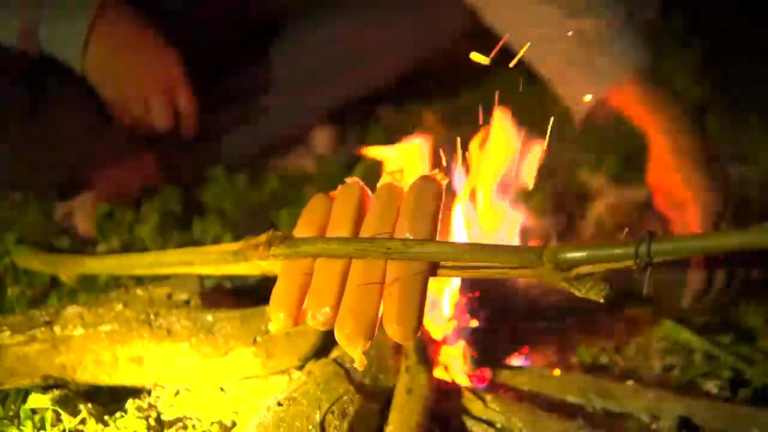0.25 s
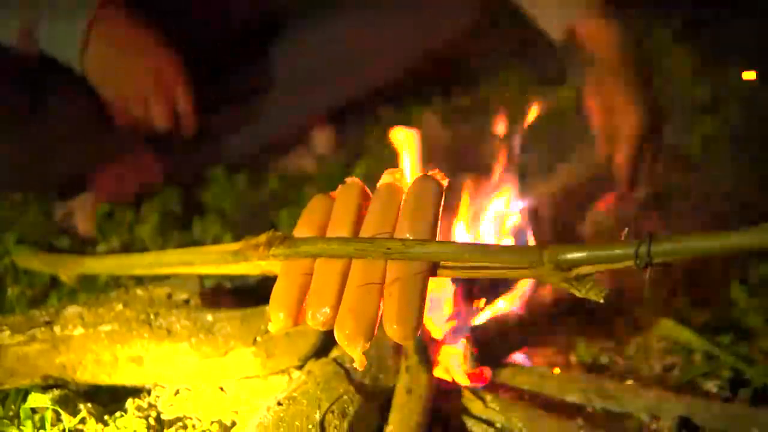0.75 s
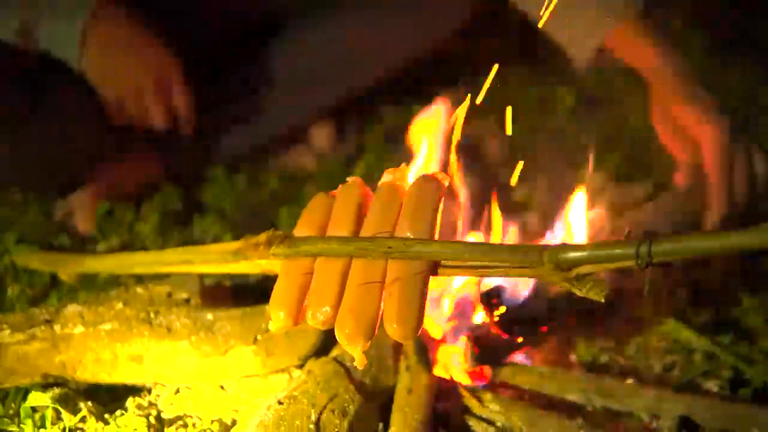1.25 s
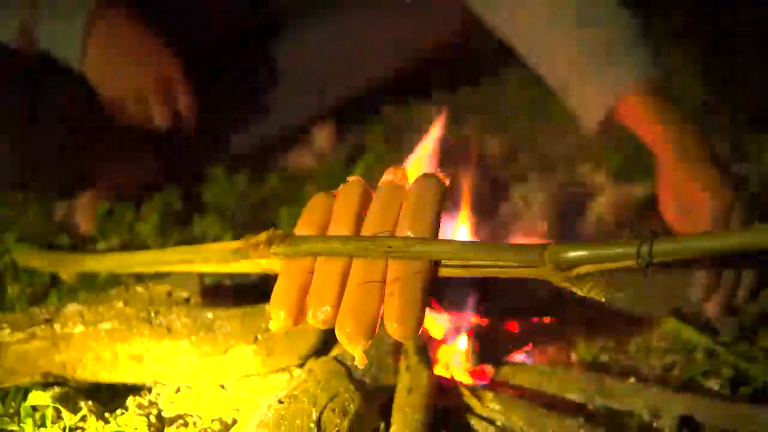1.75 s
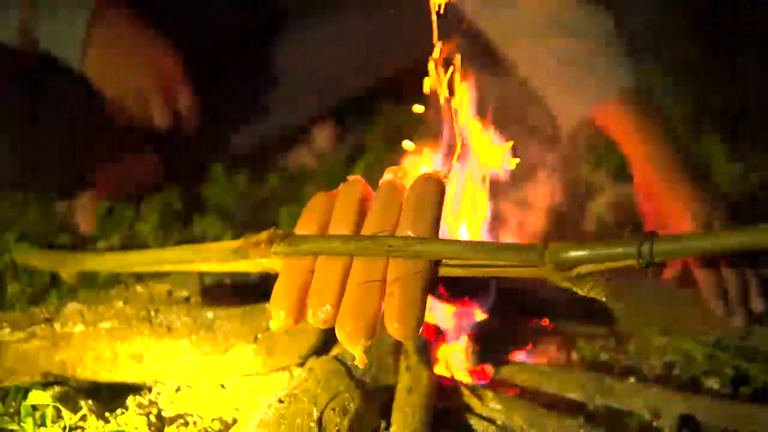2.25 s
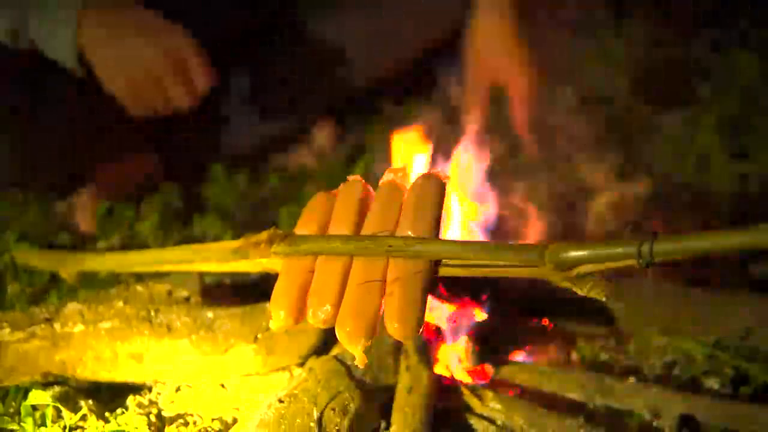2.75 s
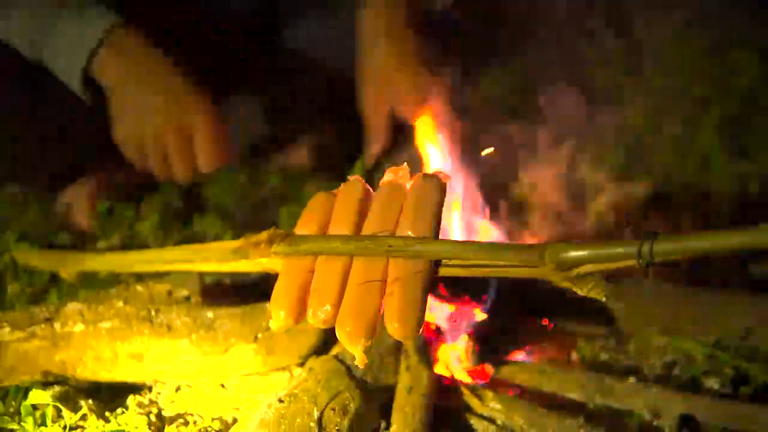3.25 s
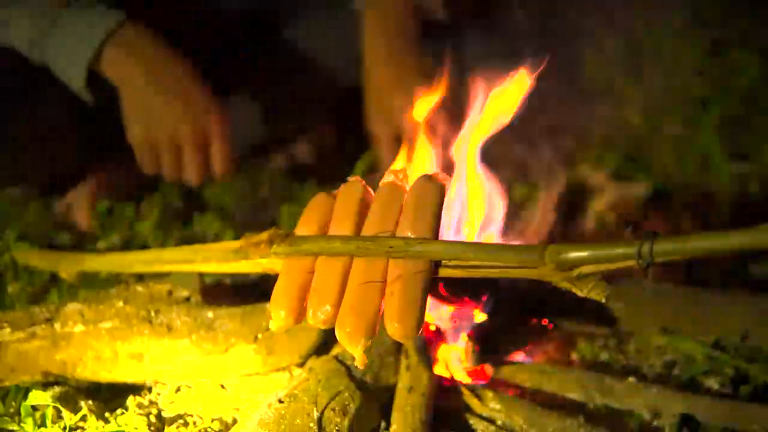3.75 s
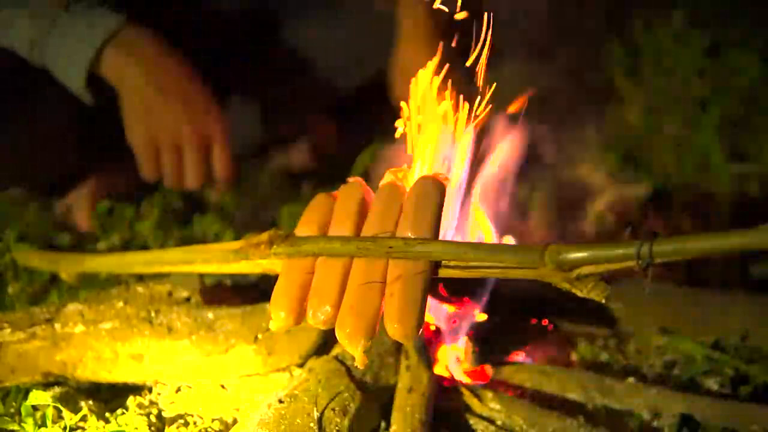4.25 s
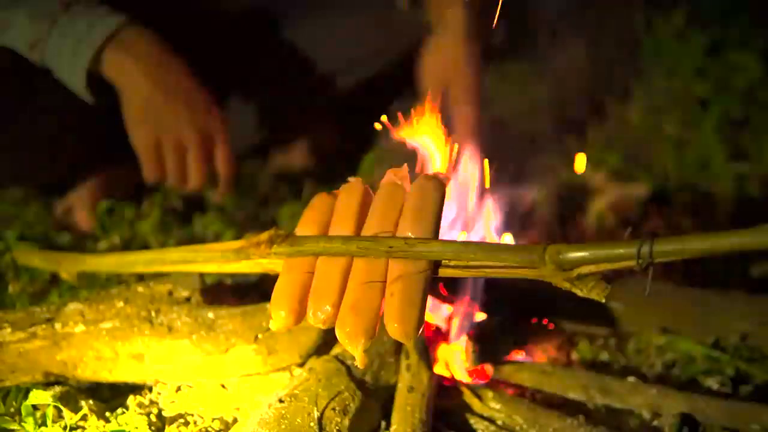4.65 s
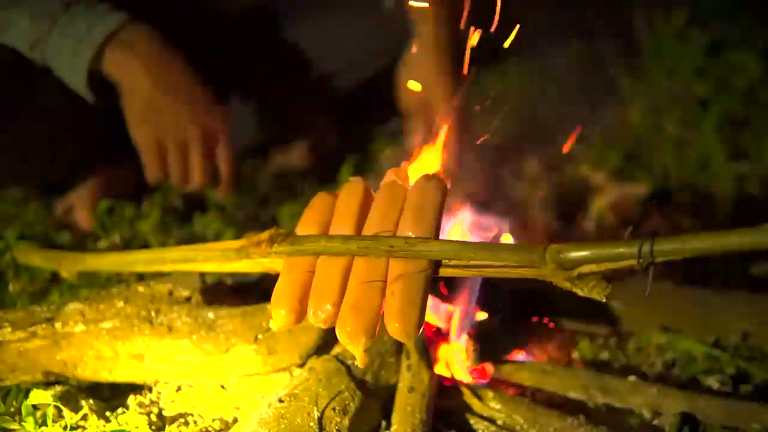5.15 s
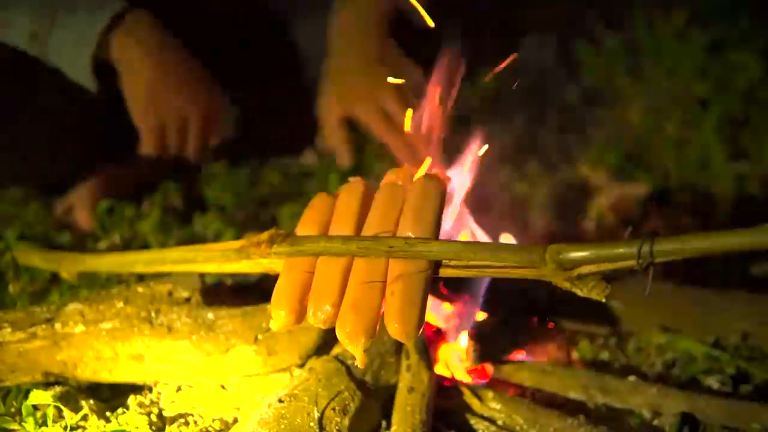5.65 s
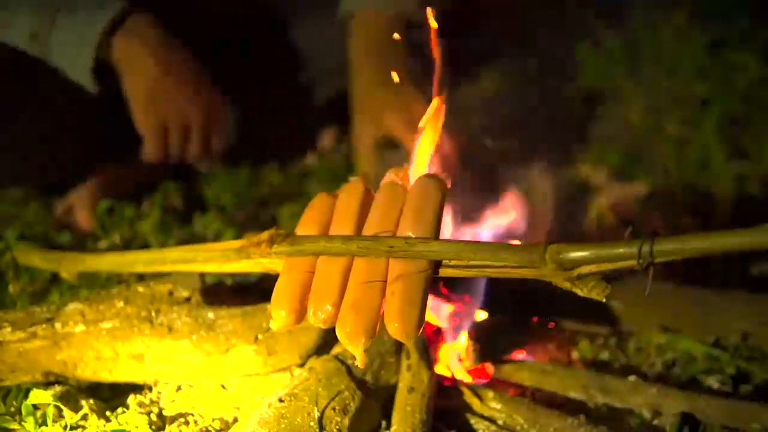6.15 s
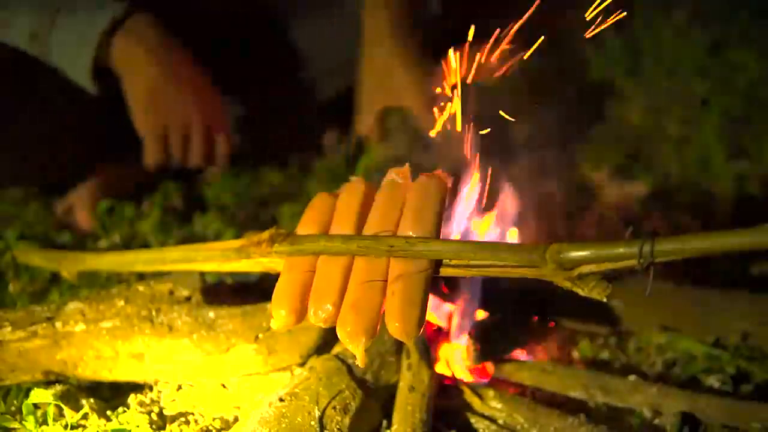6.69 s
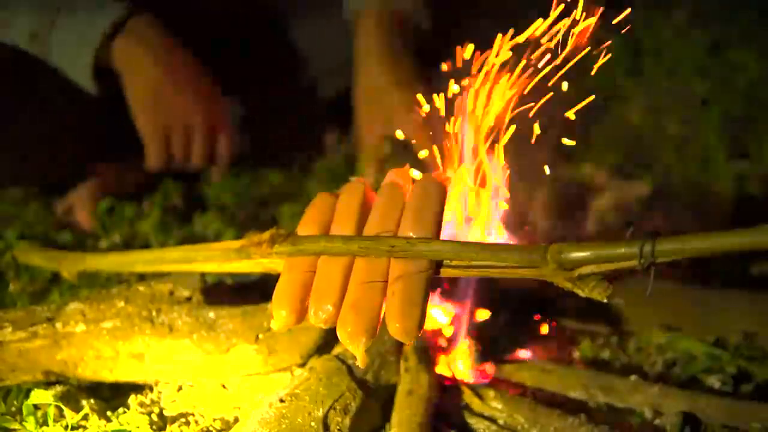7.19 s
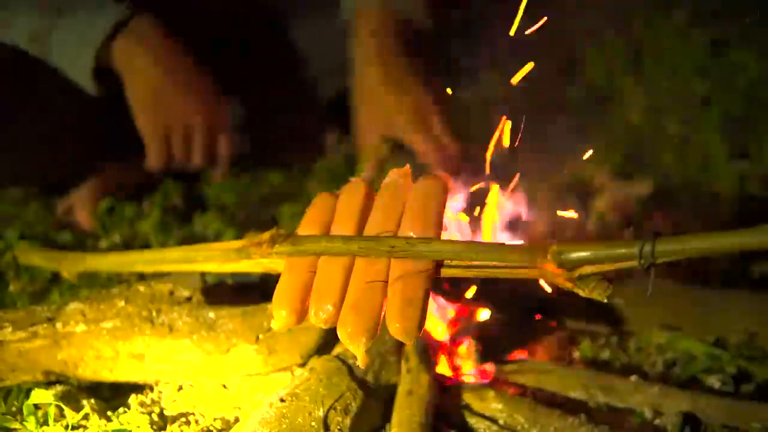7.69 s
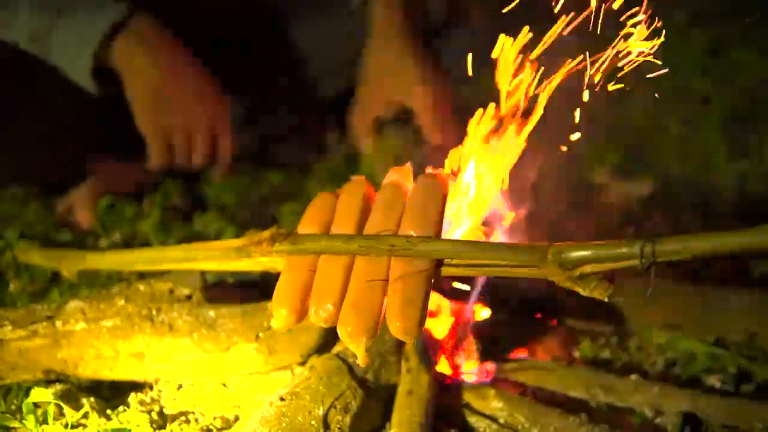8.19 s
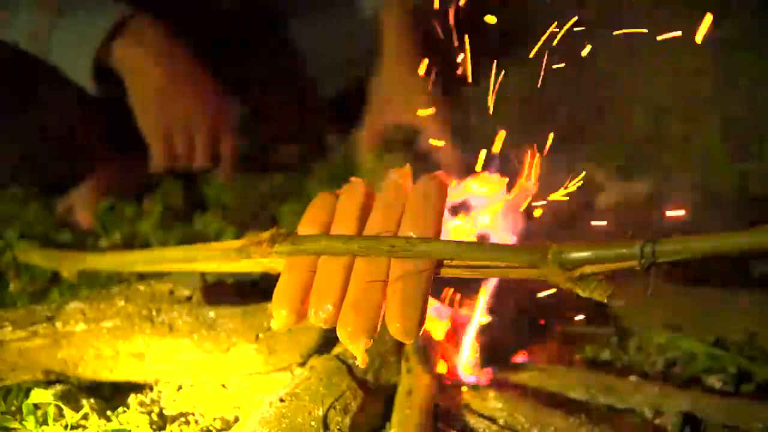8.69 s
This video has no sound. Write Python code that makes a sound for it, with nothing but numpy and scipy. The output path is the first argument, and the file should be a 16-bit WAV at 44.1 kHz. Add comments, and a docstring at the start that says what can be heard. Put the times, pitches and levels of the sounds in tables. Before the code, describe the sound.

Night insects trill and chirp without pause outdoors while a small wood campfire sizzles, pops and cracks, with dry stalks rustling and a few soft knocks.

```python
"""A summer night by a small campfire. From start to end two insects trill without a break and three chirp, in
short trains of tones like wing strokes, over a far crowd and night air; a sixth chirps twice at 1 s. From 0.3 s
handfuls of stalks make noise swell into sizzle and rustle. Wood pops, as noise that grows to a crack and fades:
strongly near 1.8 s, after a big flare at 4 s, in a burst at 7 s and once more at 8.9 s. Soft knocks, made of
fading tones, fall in between, and dull wooden ones sound with some of the pops."""
import sys
import numpy as np
from scipy import signal
from scipy.fft import rfft, irfft, next_fast_len
from scipy.io import wavfile
from scipy.ndimage import uniform_filter1d, map_coordinates

SR = 44100
rng = np.random.default_rng(int(sys.argv[2]) if len(sys.argv) > 2 else 0)


def store_pcm(level_fs):
    """Save levels as 16-bit WAV."""
    pcm = np.round(np.clip(level_fs, -1, 1) * 32767).astype(np.int16)
    wavfile.write(sys.argv[1], SR, np.atleast_2d(pcm).T)


N = 393813  # length in samples


def amp(db):
    """Turn decibels into a plain gain."""
    return 10 ** (np.asarray(db) / 20)


def unit(x):
    """Scale to an average (rms) size of 1."""
    return x / np.sqrt(np.mean(x ** 2) + 1e-20)


def along(points, hz):
    """Read a curve of (pitch_hz, value) points on a log pitch axis."""
    f, v = np.transpose(points)
    return np.interp(np.log(hz + 1), np.log(f + 1), v)


def curves(rows):
    """One value per sample for each column after the time."""
    s, *cols = np.transpose(rows)
    return [np.interp(np.arange(N) / SR, s, c) for c in cols]


def wobble(rate):
    """A smooth random curve with rate knots a second."""
    knots = rng.standard_normal(int(N * rate / SR) + 4)
    return map_coordinates(knots, [np.arange(N) * rate / SR])


def filtered(x, response):
    """Multiply the spectrum of x by a response to frequency."""
    m = next_fast_len(N + 8192)
    return irfft(rfft(x, m) * response(np.fft.rfftfreq(m, 1 / SR)), m)[..., :N]


def sides(pan_db):
    """Left and right gains; a positive pan is louder on the left."""
    return amp([[pan_db / 2], [-pan_db / 2]])


def strokes(times, size, hz, glide_hz, length):
    """Wing strokes: short tones centred on their times (s), gliding by glide_hz over their length (s)."""
    u = np.linspace(-.5, .5, max(round(length * SR), 8))
    turns = (np.reshape(hz, (-1, 1)) * u + glide_hz * u * u / 2) * length
    turns = turns + rng.random((len(times), 1))  # each starts anywhere in its cycle
    tones = np.reshape(size, (-1, 1)) * np.cos(np.pi * u) ** 2 * np.sin(2 * np.pi * turns)
    at = np.round((times[:, None] + u * length + 1) * SR).astype(int)  # one spare second at each end
    return np.bincount(at.ravel(), tones.ravel(), N + 2 * SR)[SR:SR + N]


def in_grass(x, pan_db, wet_db, t60, left_late=0):
    """Direct sound plus scatter off the plants, unlike on the two sides and shifting as they stir."""
    t = np.arange(round(t60 * SR)) / SR
    tails = rng.standard_normal((2, 2, len(t))) * amp(-60 * t / t60)
    a, b = (signal.fftconvolve(x[None], tail / np.linalg.norm(tail[0]), axes=1)[:, :N]
            for tail in tails)
    turn = 1.41 * wobble(4)  # blends between the two scatters
    scatter = np.cos(turn) * a + np.sin(turn) * b
    direct = np.array([np.roll(x, round(left_late * SR)), x])
    return sides(pan_db) * (direct + amp(wet_db) * scatter)


def chirper(chirps, level_db, rate, hz, glide_hz, length, spread_hz, swell_db, scatter_db,
            grows_db=0, paired=0, rises_hz=0):
    """Trains of strokes, rate a second, that swell towards the middle or grow to the end."""
    counts = [round(n) for _, n in chirps]
    times = np.concatenate([s + np.arange(n) / rate - paired * (np.arange(n) % 2)
                            for (s, _), n in zip(chirps, counts)])
    place = np.concatenate([np.linspace(-1, 1, n) for n in counts])  # -1 first stroke, 1 last
    level = np.repeat(level_db, counts) - swell_db * place ** 4 - grows_db * (1 - place) / 2
    luck = rng.standard_normal((len(level), 3))
    times = times + 0.00054 * luck[:, 0]
    size = amp(level + scatter_db * luck[:, 1])
    pitch = hz + rises_hz * place / 2 + spread_hz * luck[:, 2]
    return strokes(times, size, pitch, glide_hz, length)


def triller(table, rate, hz, glide_hz, length, scatter_db):
    """One stroke whenever the slowly drifting beat passes a whole number."""
    ahead, db = curves(table)
    beat = np.arange(N) * rate / SR + ahead
    at = np.flatnonzero(np.diff(np.floor(beat)) > 0)
    luck = rng.standard_normal((len(at), 2))
    size = amp(db[at] + 4.5 + scatter_db * luck[:, 0])
    return strokes(at / SR, size, hz + 12 * luck[:, 1], glide_hz, length)


# Chirps of the low insect: start_s (first stroke), strokes (count)
LOW_CHIRPS = [(0.218, 12), (1.02, 12), (2.204, 14), (3.239, 11), (4.088, 9), (4.832, 8), (5.474, 13),
              (6.279, 7), (6.946, 17), (8.076, 9)]


def low_chirper():
    """A low insect on the right: about ten wing strokes to a chirp, loudest in the middle."""
    levels_db = np.full(len(LOW_CHIRPS), -46.5)
    low = chirper(LOW_CHIRPS, levels_db, rate=42.1, hz=2390, glide_hz=-260, length=0.026,
                  spread_hz=10.0, swell_db=2.5, scatter_db=0.54)
    return in_grass(low, pan_db=-11.5, wet_db=-10, t60=.12)


# Chirps of the middle insect: start_s (first stroke), strokes (count)
MID_CHIRPS = [(.004, 10), (.348, 10), (.705, 11), (1.068, 14), (1.455, 11), (1.805, 11), (2.115, 15),
              (2.474, 14), (2.95, 8), (3.545, 12), (3.975, 10), (4.336, 13), (4.685, 13), (5.038, 13),
              (5.443, 11), (5.77, 12), (6.106, 15), (6.46, 14), (6.825, 14), (7.18, 14), (7.56, 12),
              (7.917, 11), (8.245, 14), (8.614, 13)]


def mid_chirper():
    """A quick-winged insect whose strokes grow and rise in pitch; every second one comes early."""
    levels_db = np.full(len(MID_CHIRPS), -44.5)
    mid = chirper(MID_CHIRPS, levels_db, rate=78, hz=3850, glide_hz=-350, length=0.016, spread_hz=22,
                  swell_db=2, scatter_db=0.6, grows_db=5, paired=.002, rises_hz=60)
    return in_grass(mid, pan_db=-7, wet_db=-9, t60=.1, left_late=7e-5)


# Points on a beat that slows a little: chirp_number (count), start_s (first stroke)
QUICK_BEAT = [(0, .186), (1, .513), (8, 2.775), (11, 3.766), (26, 8.795)]


def quick_chirper():
    """An insect that repeats chirps of five wing strokes about three times a second."""
    starts = np.interp(np.arange(QUICK_BEAT[-1][0] + 1), *np.transpose(QUICK_BEAT))
    levels_db = -48 + 0.5 * rng.standard_normal(len(starts))
    quick = chirper([(s, 5) for s in starts], levels_db, rate=37.3, hz=3986, glide_hz=-900,
                    length=0.02, spread_hz=37, swell_db=2.0, scatter_db=1.5)
    return in_grass(quick, pan_db=-7, wet_db=-5, t60=.08, left_late=7e-5)


# Chirps of the thin, high insect: start_s (first stroke), strokes (count, rounded)
THIN_CHIRPS = [(.99, 5), (1.29, 4.5)]
# One level for each of these chirps, before panning: level_db
THIN_DB = [-53, -55]


def thin_chirper():
    """A high, faint insect: two chirps of wing strokes, heard without scatter."""
    thin = chirper(THIN_CHIRPS, THIN_DB, rate=43, hz=7270, glide_hz=-60, length=0.027,
                   spread_hz=12, swell_db=2.0, scatter_db=1.5)
    return sides(-1.5) * thin


# Drift of the left trill: time_s, ahead_strokes (ahead of a steady beat), level_db (4.5 is added)
LEFT_TRILL = [(0, 0.27, -54), (2.4, 0.28, -54), (3.2, 0.081, -54.5), (4.5, 0.056, -54.5), (5.5, -0.13, -54),
              (6.6, -.17, -54), (8, -0.15, -55.5), (8.93, -0.0038, -54)]


def left_trill():
    """An unbroken trill on the left: fast, even wing strokes."""
    trill = triller(LEFT_TRILL, rate=65.5, hz=2548, glide_hz=-120, length=0.015, scatter_db=2.5)
    return in_grass(trill, pan_db=5.0, wet_db=-3.0, t60=0.16, left_late=-5e-5)


# Drift of the right buzz: time_s, ahead_strokes (ahead of a steady beat), level_db (4.5 is added)
RIGHT_BUZZ = [(0, -0.43, -54), (.6, -0.26, -49.5), (1.5, -0.45, -51), (3.4, -0.21, -48), (5, -0.53, -53),
              (6, -1.01, -49.5), (6.5, -.86, -48.5), (7.6, -0.98, -49.5), (8, -1.16, -49.5),
              (8.93, -0.94, -58)]


def right_buzz():
    """An unbroken, slower and higher trill on the right, with more scatter than direct sound."""
    buzz = triller(RIGHT_BUZZ, rate=32.3, hz=4920, glide_hz=400, length=.014, scatter_db=1.5)
    return in_grass(buzz, pan_db=-9.5, wet_db=4.5, t60=.12, left_late=6e-5)


def singers():
    """The six near insects, each at its own pitch, beat and place."""
    chirping = low_chirper() + mid_chirper() + quick_chirper() + thin_chirper()
    return chirping + left_trill() + right_buzz()


# Edges of the two treble bands of a pop, fizz then snap: low_hz, high_hz
POP_HZ = [(7500, 16000), (4000, 7500)]
SNAP_DB, BODY_DB = -1.5, -6.5  # snap against the mean of fizz and wood; lower wood band against wood
BODY_RATIO = 0.61  # pitch of the lower wood band against the wood
FADE_S = 0.022  # basic fade of a pop, adjusted for each band
CRACK_MS = 59  # divided by the tearing time, gives the crack's size over the tearing noise


def pops(rows):
    """Fibres tear louder and louder, a pocket of steam cracks open; the wood rings in two bands."""
    out, lead = np.zeros(N + SR), 900  # lead: samples kept before each crack
    t = (np.arange(2400) - lead) / SR
    hz = np.fft.rfftfreq(len(t), 1 / SR) + 1
    treble = [1 / (1 + (lo / hz) ** 8) / (1 + (hz / hi) ** 8) for lo, hi in POP_HZ]
    lasts = FADE_S * np.array([[.8], [.9], [1.1], [1.5]]) + 0.0026  # fizz, snap, wood, body
    for s, fizz_db, wood_db, wood_hz, tear_ms in rows:
        tearing = tear_ms + 1
        shape = amp(-60 * np.where(t < 0, -t * 1e3 / tearing, t / lasts) ** 1.08)
        wood = np.exp(-(np.log(hz / wood_hz) / 0.29) ** 2)
        body = 1 / (1 + (np.log(hz / wood_hz / BODY_RATIO) / 0.22) ** 2) ** 0.66
        # short tearing ends in a sharper crack
        force = rng.standard_normal(len(t)) + CRACK_MS / tearing * (t == 0)
        puff = irfft(rfft(force) * (treble + [wood, body])) * shape
        snap_db = (fizz_db + wood_db) / 2 + SNAP_DB
        levels_db = np.array([fizz_db, snap_db, wood_db, wood_db + BODY_DB])
        puff *= amp(levels_db)[:, None] / np.abs(puff).max(1, keepdims=True)
        out[round(s * SR) - lead:][:len(t)] += puff.sum(0)
    return out[:N]


def spits(sizzle):
    """Rows for small random pops: more come when the flaring fire sizzles louder."""
    total = np.cumsum(sizzle[SR // 10:])
    luck = rng.random((round(5 * N / SR), 4))  # 5 a second on average
    s = np.searchsorted(total, luck[:, 0] * total[-1]) / SR + .1
    size_db = -49 - 3.5 * np.log(1 - 0.94 * luck[:, 1])  # most are near the least, -49 dB
    wood_db = size_db - 14 * luck[:, 2]
    wood_hz = 1500 * 1.9 ** luck[:, 3]
    return list(zip(s, size_db, wood_db, wood_hz, np.full(len(s), 7.7)))  # tear_ms last


# Stalks dropped on the flame: middle_s, half_length_s, sizzle_db, hollow_rustle_db, dry_rustle_db
HANDFULS = [(0.276, .15, -56, -66, -67), (.88, .1, -56, -61.5, -60), (1.88, .1, -56.5, -71, -58),
            (2.88, .17, -57.5, -63, -61), (4.063, .1, -45.5, -60, -52), (4.4, .15, -55, -70, -61),
            (4.848, .2, -56, -64.5, -59), (5.18, .05, -62, -59, -53), (5.271, .07, -53, -64, -59),
            (6.405, .12, -56, -69, -54.5), (7.08, .07, -49, -61.5, -59), (8.027, .12, -52, -62, -54),
            (8.503, .18, -57, -57.5, -61)]
# Steady levels between handfuls: sizzle_db, hollow_rustle_db, dry_rustle_db
EMBERS_DB = [-59.5, -69, -63]


def flares():
    """Gains of sizzle, hollow and dry rustle: a steady bed plus one swell of power per handful."""
    t = np.arange(N) / SR
    t = t[::64]  # the swells are slow
    power = sum(amp(db)[:, None] ** 2 * np.exp(-((t - s) / half) ** 2) for s, half, *db in HANDFULS)
    gains = np.sqrt(amp(EMBERS_DB)[:, None] ** 2 + power)
    return np.repeat(gains, 64, axis=1)[:, :N]


def rush(spectrum, alike, patchy_db, grain_db):
    """Stereo noise of rms 1 with patches of random gain and a fast grain."""
    noise = rng.standard_normal((2, N)) * amp(grain_db * wobble(150))
    z = signal.stft(noise, nperseg=512)[2]
    field = rng.standard_normal(z.shape[1:])
    field = uniform_filter1d(uniform_filter1d(field, 6, 0), 10, 1)  # smooth over pitch, then time
    pair = signal.istft(z * amp(patchy_db * unit(field)), nperseg=512)[1][:, :N]

    def response(hz):
        turn = np.arccos(np.clip(along(alike, hz), -1, 1)) / 2  # sets how alike the sides are
        return amp(along(spectrum, hz)) * [np.cos(turn), np.sin(turn)]

    mid, side = filtered(pair, response)
    return unit(np.array([mid + side, mid - side]))


# Knocks: start_s, level_db (before rise and fade), pitch_hz, fade_s (to 60 dB down)
THUMPS = [(.53, -64, 140, 0.046), (.786, -52, 304, 0.029), (.818, -59, 150, .05), (1.775, -37, 1350, .03),
          (3.17, -64, 131, 0.036), (3.946, -46.5, 1075, 0.059), (4.064, -48, 1062, .08),
          (4.14, -50, 1080, 0.12), (4.083, -44.5, 1090, 0.09), (3.62, -66, 170, 0.04),
          (6.998, -47, 950, 0.044), (7.056, -43, 930, 0.065), (7.08, -42, 1030, 0.038),
          (5.14, -49, 626, 0.11), (5.19, -51, 691, 0.13), (5.235, -54.5, 616, 0.09)]


def thumps():
    """Soft knocks: faint low ones of a hand or stick on the ground, and dull wood knocks that sound with some
    pops; tones that start softly and fade."""
    out, t = np.zeros(N + SR), np.arange(SR // 5) / SR
    for s, db, hz, t60 in THUMPS:
        rise = 1 - np.exp(-t / 0.0014)
        out[round(s * SR):][:len(t)] += amp(db - 60 * t / t60) * rise * np.sin(2 * np.pi * hz * t)
    return out[:N]


# Pops: crack_s, fizz_db (peak), wood_db (peak), wood_hz, tear_ms (1 is added); levels before scatter
POPS = [(.1453, -33, -40, 2540, 14), (.2665, -23, -51, 2330, 6), (.8408, -30, -32.5, 2700, 8.7),
        (.8466, -30, -35, 2390, 7.6), (.9523, -38, -39, 4480, 11), (1.2105, -21, -37, 2500, 4.2),
        (1.5563, -43, -50, 3820, 7.4), (1.776, -19.5, -23, 2600, 11.1), (1.7969, -37, -50, 2500, 12),
        (1.8117, -38, -44, 3150, 12), (1.821, -34, -45, 3730, 8.5), (1.93, -36, -56, 2560, 8),
        (3.6129, -40, -50, 4400, 6), (3.857, -40, -42, 2670, 9.5), (3.9463, -30, -49, 2050, 7.1),
        (4.0198, -29, -28, 3170, 4.2), (4.0818, -31.5, -47, 4390, 14), (4.1134, -34, -40, 2610, 16),
        (4.3667, -34.5, -46, 2970, 12), (4.565, -42, -56, 2570, 8), (4.7539, -20.5, -30, 2640, 4.2),
        (4.7792, -37, -42, 3800, 8), (4.833, -34, -56, 2400, 8), (4.9014, -35, -51, 2400, 8),
        (4.9367, -40, -60, 2580, 8), (5.046, -36, -56, 2510, 8.5), (5.137, -45, -32, 1850, 2.2),
        (5.1485, -56, -36, 1720, 15), (5.205, -58, -46, 1750, 15), (5.6119, -31, -34.5, 3380, 5.8),
        (5.8775, -62, -47, 3700, 3), (6.0581, -32, -58, 2510, 8), (6.4075, -38, -51, 2510, 8),
        (6.453, -44, -43.5, 2250, 12), (6.996, -28, -29, 2040, 13), (7.028, -42, -43, 1730, 12),
        (7.0532, -37, -26, 3550, 5.8), (7.0776, -33, -33.5, 1610, 23), (7.0803, -25, -22, 3080, 6.1),
        (7.087, -28.5, -33, 1250, 13), (7.1032, -31, -36, 1950, 16), (7.886, -47, -49, 1970, 8),
        (7.9168, -40, -44, 1620, 8.8), (7.9652, -51, -42, 1955, 8.4), (8.0311, -42, -42.5, 1730, 14),
        (8.1283, -39, -39, 2880, 9.1), (8.2041, -43, -47, 1740, 8), (8.335, -41, -51, 3850, 8),
        (8.4545, -42, -50, 1910, 14), (8.571, -35, -44, 2050, 8), (8.6075, -32.5, -45, 2160, 22),
        (8.6397, -37, -56, 2510, 8), (8.8089, -45, -54, 2500, 8), (8.9187, -20.5, -35, 1150, 7.7)]
# Tone colour of the sizzle: pitch_hz, relative level_db (per Hz)
SIZZLE = [(600, -60), (2500, -30), (5000, 6.5), (7500, 2.5), (9000, 0), (11000, -1.5), (13500, -5),
          (15000, -0.5)]
# Tone colour of the hollow rustle: pitch_hz, relative level_db (per Hz)
HOLLOW = [(100, -56), (250, -27.5), (500, -15), (850, -9.5), (1100, -2.5), (1400, -10), (2500, -30)]
# Tone colour of the dry rustle: pitch_hz, relative level_db (per Hz)
DRY = [(300, -62), (900, -29.5), (1400, -13), (1750, -6), (2200, -0.5), (3200, -1.5), (5000, -16),
       (8000, -30)]


def fire():
    """Pops with a short scatter from nearly straight ahead, over sizzle, rustling stalks and knocks."""
    sizzle, hollow, dry = flares()
    cracks = pops(POPS + spits(sizzle))
    # leaves soak up the treble of the scatter
    dull = filtered(cracks, lambda hz: 1 / (1 + (hz / 6000) ** 2))
    burst = sides(1.0) * (cracks - dull) + in_grass(dull, pan_db=0.0, wet_db=-5.5, t60=0.18)
    # the short lists say how alike left and right are: pitch_hz, likeness (0 to 1)
    sizzle = sizzle * rush(SIZZLE, [(5000, 0.2), (8000, 0.65), (12000, 1.0)], patchy_db=3.4, grain_db=0.5)
    hollow = hollow * rush(HOLLOW, [(1000, 0.48)], patchy_db=3.0, grain_db=1.5)
    dry = dry * rush(DRY, [(1000, 0.97)], patchy_db=2.5, grain_db=1.5)
    return burst + sizzle + hollow + dry + thumps()


def crowd(hz, spread_hz, length, db, pan_db):
    """Too many singers to tell apart: strokes at random times, other ones on each side."""
    both = []
    for _ in range(2):
        luck = rng.standard_normal((11000, 2))
        times = rng.random(len(luck)) * N / SR
        side = strokes(times, amp(0.31 * luck[:, 0]), hz + spread_hz * luck[:, 1], -100, length)
        both.append(unit(side))
    return amp(db + 0.14 * wobble(1.43)) * sides(pan_db) * np.array(both)


def faint_crowd(hz, spread_hz, db, pan_db):
    """Fainter singers blur to a narrow hiss that swells slowly."""
    hiss = rng.standard_normal((2, N))
    hiss = filtered(hiss, lambda f: np.exp(-((f - hz) / spread_hz) ** 2 / 4))
    return amp(db + 2.3 * wobble(2.3)) * sides(pan_db) * unit(hiss)


# Far crowds: pitch_hz, pitch_spread_hz, stroke_s (length), level_db, left_right_db
CROWDS = [(4942, 175, .009, -46.5, -1), (2498, 93, 0.011, -56.5, 0)]
# Fainter crowds: pitch_hz, spread_hz, level_db, left_right_db
FAINT = [(2033, 96, -64, -4), (3270, 510, -64, -6.5), (3850, 273, -58, -2), (6050, 130, -64, -6),
         (6710, 310, -60, -7)]


def far_singers():
    """Far crowds of strokes and hisses, plus a thin band about an octave over the loudest crowd."""
    far = sum(crowd(*row) for row in CROWDS) + sum(faint_crowd(*row) for row in FAINT)
    # averaging the sides makes the band central and about 3 dB softer
    overtone = faint_crowd(hz=9980, spread_hz=220, db=-66, pan_db=2).mean(0)
    return far + overtone


# Tone colour of the night air: pitch_hz, relative level_db (per Hz)
NIGHT = [(25, -24.5), (100, -18.5), (200, -17.5), (370, -6), (650, 0), (1000, -1.5), (1500, -2.5),
         (3000, -9.5), (5700, -6.5), (7300, -2.5), (9000, -18), (12000, -42)]
# How alike left and right are in the air: pitch_hz, likeness (0 to 1)
ALIKE = [(60, 0), (160, 0.65), (400, 0.15), (2000, 0), (7000, 0), (9000, .8)]
# Lean of the air to one side: pitch_hz, left_right_db
LEAN = [(100, -1), (700, 2), (1200, 5.5), (2000, 3), (8000, 7)]


def night_air():
    """A soft, patchy rush of noise that leans left or right by pitch."""
    air = rush(NIGHT, ALIKE, patchy_db=1.6, grain_db=-0.85)
    left_right = np.array([[1], [-1]])
    return amp(-58.5) * filtered(air, lambda hz: amp(along(LEAN, hz) / 2 * left_right))


def scene():
    """Near insects, fire, far crowd and night air together."""
    return singers() + fire() + far_singers() + night_air()


def record(dry):
    """Nothing is kept from 13700 Hz up."""
    return filtered(dry, lambda hz: hz < 13700)


dry = scene()
out = record(dry)
store_pcm(out)
```